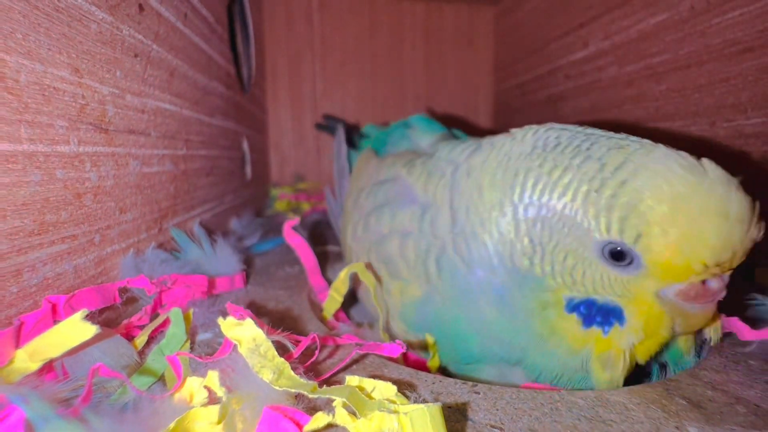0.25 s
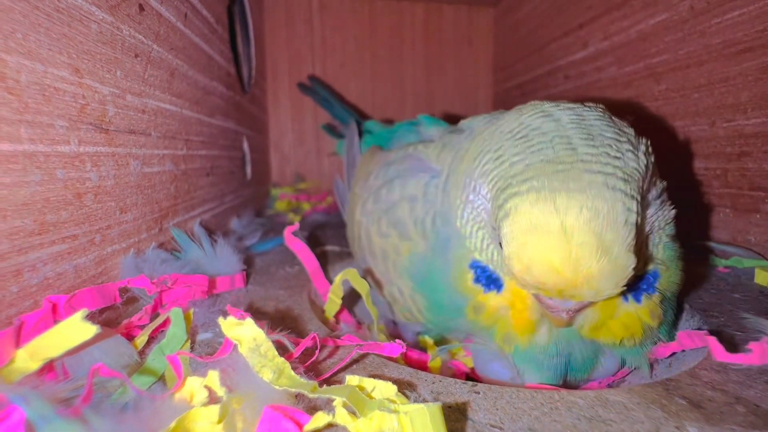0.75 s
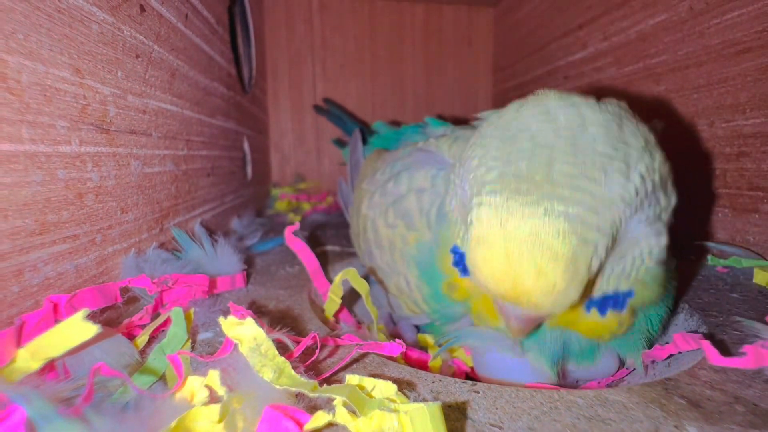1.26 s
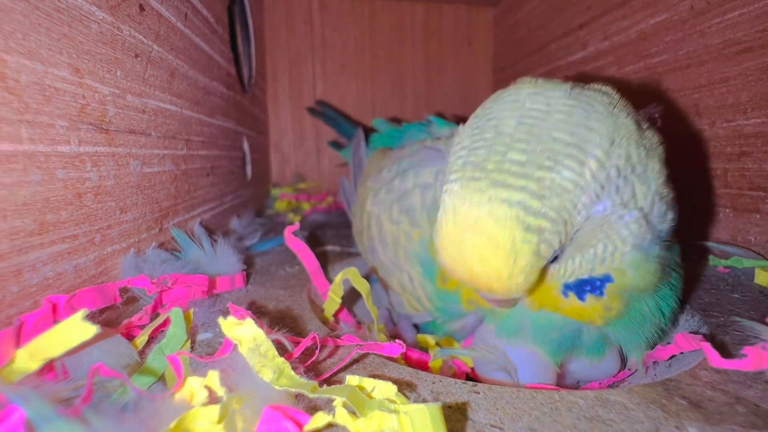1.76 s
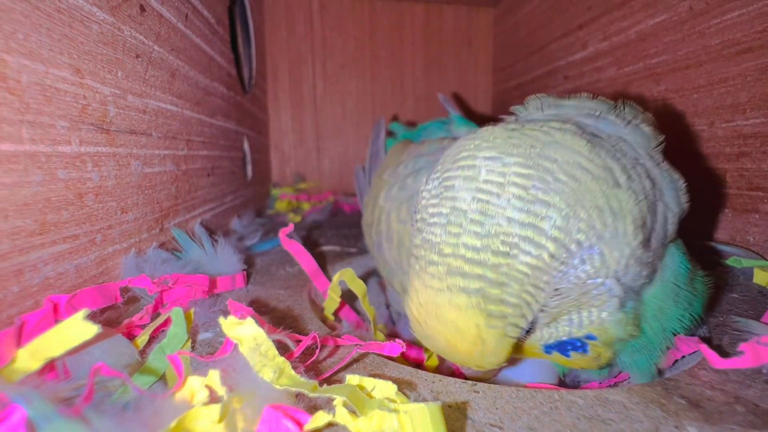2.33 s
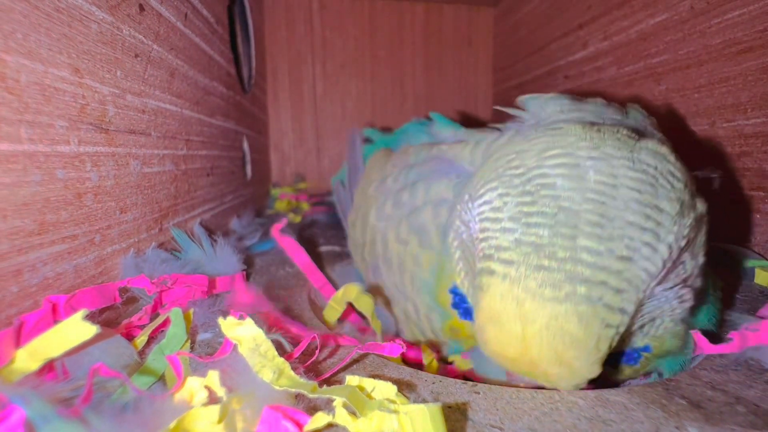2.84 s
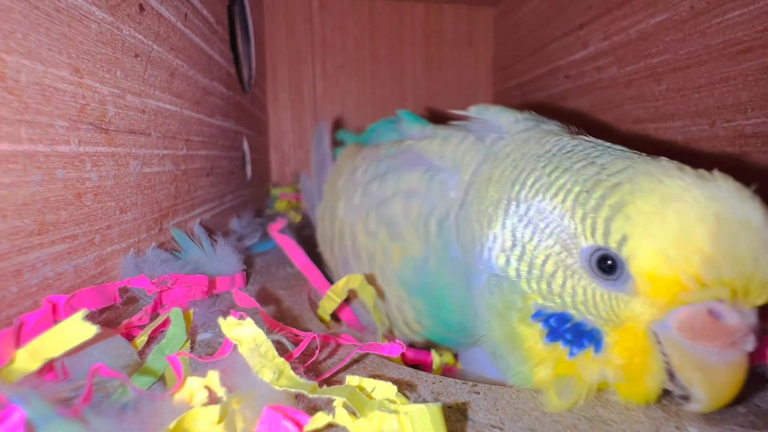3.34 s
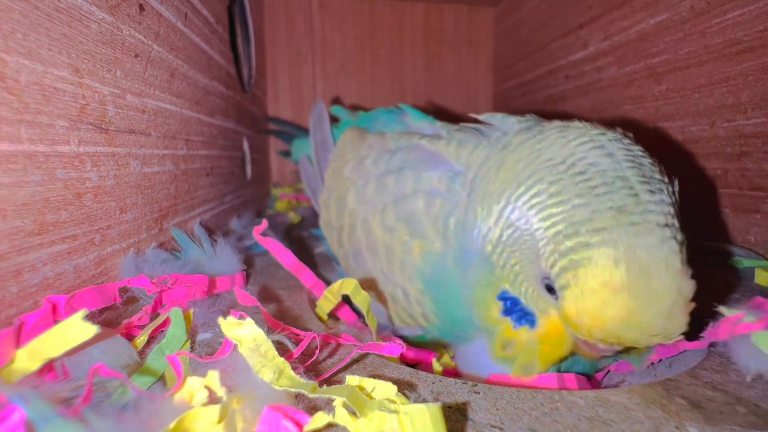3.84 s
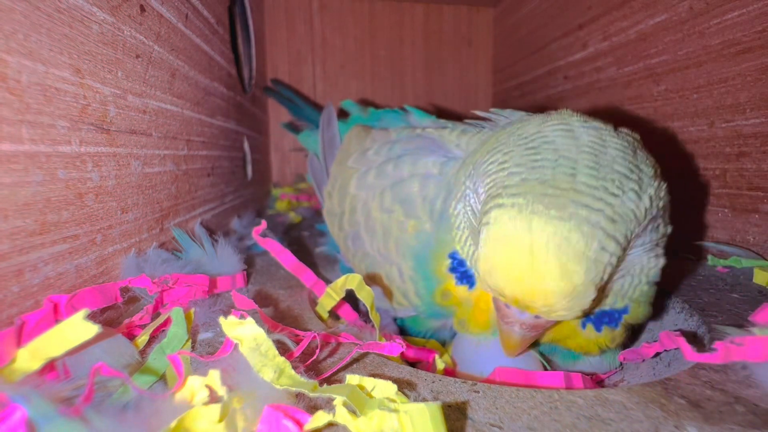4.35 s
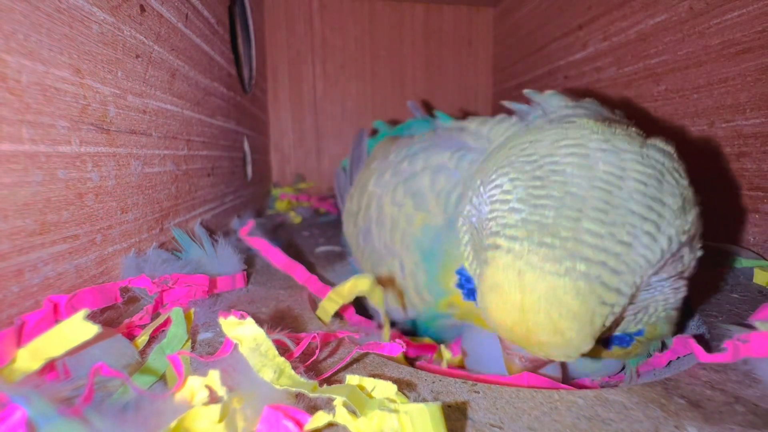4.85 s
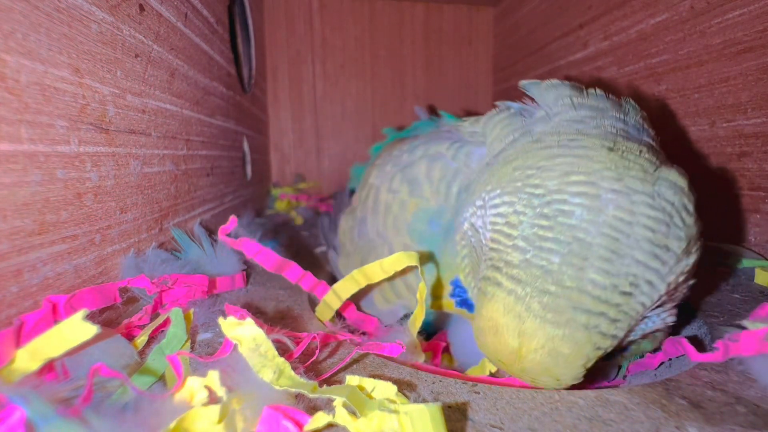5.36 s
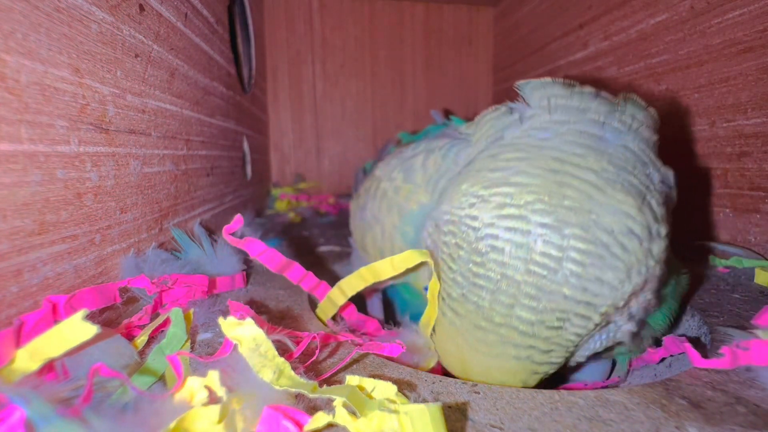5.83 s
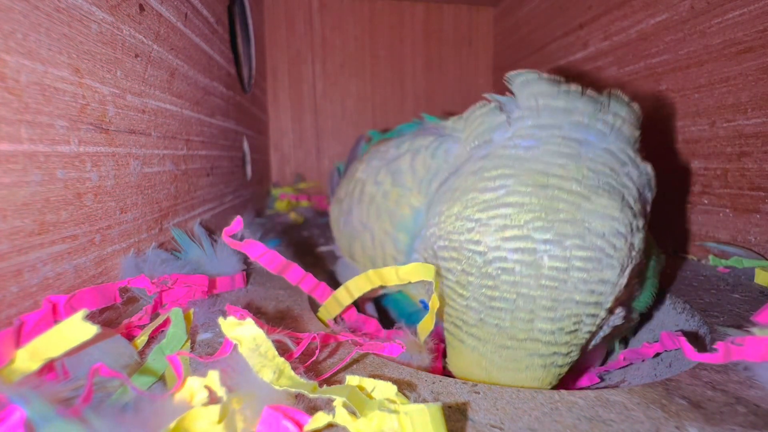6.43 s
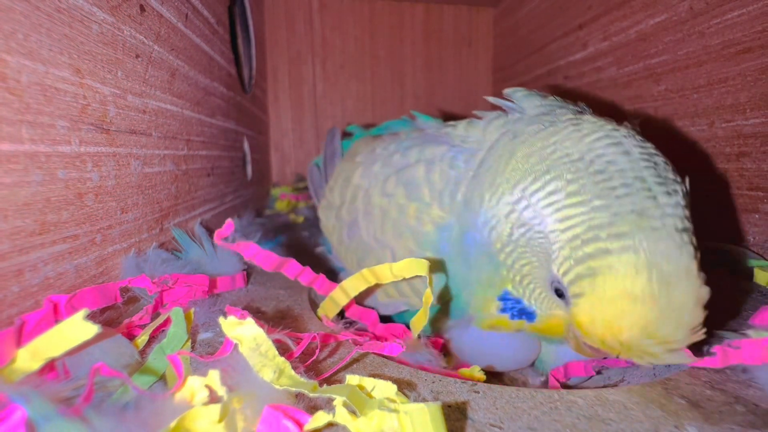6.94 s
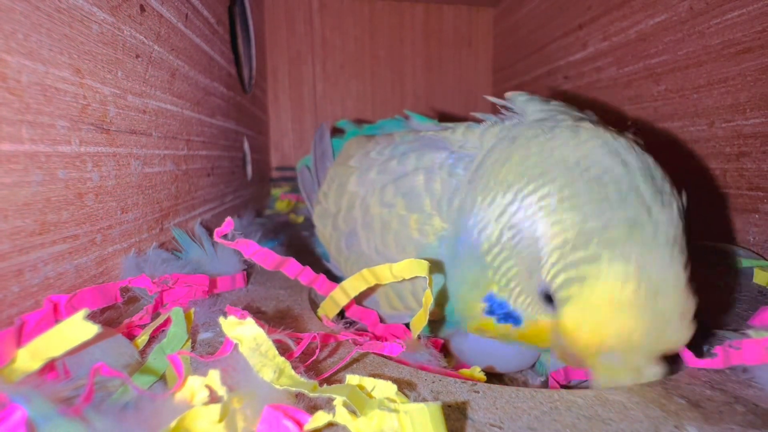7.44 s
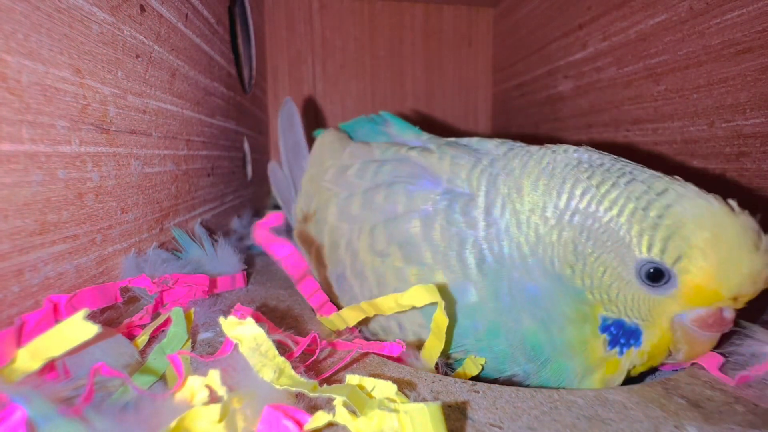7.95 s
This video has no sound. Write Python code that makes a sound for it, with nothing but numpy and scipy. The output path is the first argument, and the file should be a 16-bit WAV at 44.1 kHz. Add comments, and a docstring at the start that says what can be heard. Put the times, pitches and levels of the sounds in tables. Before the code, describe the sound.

Heard from close by, a wooden nest box gives a soft hollow thump as a small bird moves in its paper bedding. Scattered scratches and beak taps lead into a busier run of bumps on the floor, with paper strips crackling and snapping. After a short lull comes one more cluster of knocks and rustles. A faint electrical hum and steady hiss lie underneath throughout.

```python
"""A rustle and a knock come first: a small parrot shuffles in a wooden nest box lined with shredded paper.
Its feet, body and eggs bump the floor, whose panels boom; its claws and beak tap the wood,
and the paper strips crackle and snap. A faint tone joins in near the end. Behind it all are
a mains hum, a wavering low rumble and a steady hiss with a hump near two kilohertz."""
import sys
import numpy as np
from scipy import signal
from scipy.fft import rfft, irfft
from scipy.io import wavfile
from scipy.ndimage import uniform_filter1d

SR = 44100
rng = np.random.default_rng(int(sys.argv[2]) if len(sys.argv) > 2 else 0)


def unload_wav(signal):
    """Save mono or channel-first audio to the path in sys.argv[1] as 16-bit WAV at rate SR, clipped to [-1, 1]."""
    wavfile.write(
        sys.argv[1],
        SR,
        np.round(np.clip(np.atleast_2d(signal).T, -1, 1) * 32767).astype(np.int16),
    )


N = 361179

# the notes the box rings at, the floor panel's three first: f/Hz, level/dB, time to fade by 60 dB/s
BOX_NOTES = [(226.6, -12.5, 0.32), (257.2, -2, 0.099), (286.6, 5, 0.093), (409.3, -16, 0.061),
             (513.6, -19.5, 0.039), (612.4, -18.5, 0.036), (738, -12, 0.023), (880.4, -26.5, 0.091),
             (1214, -26, 0.02), (1350, -22, 0.03), (1451, -26, 0.053), (2226, -19, 0.016)]


def amp(db):
    """Turns decibels into a number to multiply by."""
    return 10 ** (np.asarray(db) / 20)


def unit(x):
    """Scales a signal to an average power of 1."""
    return x / np.sqrt(np.mean(x ** 2) + 1e-20)


def curve_at(points, hz):
    """Reads between the points of a frequency curve."""
    f, value = np.transpose(points)
    return np.interp(np.log(hz + 1), np.log(f + 1), value)


def add(mix, s, sound):
    """Mixes a sound in, starting at s seconds."""
    part = mix[..., round(s * SR):][..., :sound.shape[-1]]
    part += sound[..., :part.shape[-1]]


def shaped(x, gain):
    """Turns each frequency up or down by gain(Hz)."""
    return irfft(rfft(x) * gain(np.fft.rfftfreq(x.shape[-1], 1 / SR)), x.shape[-1])


def bell(hz, centre_hz, width):
    """A smooth hump round one pitch; width is in log frequency."""
    return np.exp(-(np.log((hz + 1) / centre_hz) / width) ** 2)


def wander(top_hz):
    """A random drift; a higher top_hz makes it quicker."""
    return unit(shaped(rng.standard_normal(N), lambda hz: np.exp(-(hz / top_hz) ** 2)))


def patchy(x, depth_db, size=14, top_hz=20000):
    """Makes random bands below top_hz swell and dip; size is their width in frequency steps."""
    hz, _, spectrum = signal.stft(x, SR, nperseg=512)
    patches = uniform_filter1d(rng.standard_normal(spectrum.shape[1:]), size=size, axis=0)
    patches = unit(uniform_filter1d(patches, size=8, axis=1))
    gain = amp(depth_db * patches * (hz < top_hz)[:, None])
    return signal.istft(spectrum * gain, nperseg=512)[1][:, :N]


def bouts(rows, rest_db, rise_db_s, fall_db_s, column=2):
    """A loudness curve: each row rises, holds and falls back to a resting level."""
    t, power = np.arange(N) / SR, np.full(N, amp(2 * rest_db))
    for row in rows:
        early, late = np.maximum(row[0] - t, 0), np.maximum(t - row[0] - row[1], 0)
        power += amp(2 * (row[column] - rise_db_s * early - fall_db_s * late))
    return np.sqrt(power)


def box_ring(spot_db=0):
    """Struck wood rings in fading notes: (floor panel, upper notes). spot_db favours some of them."""
    t = np.arange(6000) / SR
    hz, db, fade_s = np.transpose(BOX_NOTES)[..., None]
    notes = amp(db + spot_db - 60 * t / fade_s) * np.sin(2 * np.pi * hz * t)
    return notes[:3].sum(0), notes[3:].sum(0)


def clicks(per_s, spread_db):
    """Clicks at random times, a few of them large."""
    size = amp(spread_db * np.minimum(rng.exponential(1, N), 3.5)) * rng.choice([-1., 1.], N)
    return size * (rng.random(N) < per_s / SR)


def softened(ring, contact_s):
    """The longer a touch lasts, the duller the ring."""
    return np.convolve(ring, np.hanning(round(contact_s * SR)))


def shuffle():
    """The bird shifts its weight, and many tiny bumps and scuffs set the wood ringing."""
    # shifts of weight: start/s, hold/s, relative bump level/dB, relative scuff level/dB
    shifts = [(0.0, 0.019, -51.5, -56.5), (0.38, 0.088, -57, -65), (0.6, 0.076, -63.5, -68.5),
              (1.33, 0.087, -56.5, -75), (1.95, 0.18, -58.5, -74), (2.26, 0.29, -55, -67),
              (2.6, 0.45, -62.5, -67.5), (3.33, 0.16, -56, -58), (3.53, 0.13, -67, -63.5),
              (4.3, 0.07, -64, -85), (4.45, 0.32, -49, -72), (4.75, 0.44, -58.5, -66.5),
              (5.1, 0.24, -54, -63.5), (5.5, 0.43, -58.5, -70.5), (5.83, 0.1, -50, -72),
              (6.03, 0.2, -58.5, -69.5), (6.33, 0.21, -55.5, -65), (7.65, 0.21, -57.5, -63),
              (7.885, 0.052, -67, -58.5), (8.07, 0.029, -53.5, -57.5)]
    panel, upper = box_ring()
    boom = unit(signal.fftconvolve(clicks(130, 3.27), softened(panel, 0.0016))[:N])
    scuff, side = (signal.fftconvolve(clicks(450, 4.6), softened(upper, 0.00051))[:N] for _ in range(2))
    scuff = patchy(scuff + 0.18 * side * np.array([[1], [-1]]), 3.7, size=3)  # left and right differ
    bumping = bouts(shifts, rest_db=-70, rise_db_s=267, fall_db_s=91)
    scuffing = bouts(shifts, rest_db=-85, rise_db_s=267, fall_db_s=91, column=3)
    return bumping * boom + scuffing * unit(scuff * amp(1.6 * wander(21)))


def paper(noises):
    """Turns three noises (shared, left, right) into a left and right that sound like paper."""
    # how strong paper is at each pitch: f/Hz, level/dB
    paper_colour = [(590, -31), (1000, -6.5), (2150, -0.5), (3050, -13.5), (3750, -6.5), (4120, -10.5),
                    (5900, -6), (6700, -6.5), (9170, -9.5), (12700, -17.5), (15100, -15), (16000, -32)]
    # rustle heard on one side only: f/Hz, share
    one_side_share = [(4000, 0.041), (7000, 0.45), (15000, 0.43)]
    own = shaped(noises[1:], lambda hz: np.maximum(curve_at(one_side_share, hz), 0))
    return shaped(noises[0] + own, lambda hz: amp(curve_at(paper_colour, hz)))


def rustle():
    """Feathers and feet rub through the paper, and each strip crackles round its own pitch."""
    # strokes through the paper: start/s, hold/s, relative level/dB
    strokes = [(0.0, .085, -56), (0.14, 0.028, -61.5), (0.355, 0.029, -58), (0.41, 0.3, -72.5),
               (0.68, 0.027, -70), (1.19, 0.031, -71), (1.6, 0.037, -73.5), (2.265, 0.046, -65),
               (2.4, 0.032, -68.5), (2.52, 0.062, -65), (2.72, 0.041, -68), (2.82, 0.027, -61),
               (2.94, .11, -68.5), (3.325, 0.048, -54), (3.4, 0.039, -54.5), (3.475, 0.067, -60.5),
               (3.56, 0.11, -65), (3.9, 0.025, -69), (4.09, 0.046, -73), (4.52, 0.022, -64.5),
               (4.625, 0.1, -61.5), (4.805, 0.025, -59.5), (4.86, 0.28, -65), (5.14, 0.17, -67),
               (5.33, 0.2, -68.5), (5.59, 0.43, -71), (5.85, 0.069, -62.5), (6.06, 0.041, -72),
               (6.19, 0.13, -68.5), (6.4, 0.23, -72), (6.73, 0.15, -72.5), (7.45, 0.03, -66.5),
               (7.685, 0.049, -58), (7.87, 0.041, -52), (7.95, 0.027, -58.5), (8.09, 0.077, -62)]
    swell_s = 0.0012  # a crackle grows for this long, then dies away
    t, crackle = np.arange(500) / SR, np.zeros((3, N))
    for hz in np.geomspace(3550, 11300, num=6):
        noise = shaped(rng.standard_normal((3, len(t))), lambda f: bell(f, hz, 0.55))
        crack = unit(noise * t * np.exp(-t / swell_s))
        crackle += signal.fftconvolve(clicks(50, 4.05)[None], crack, axes=1)[:, :N]
    rubbing = 1.82 * rng.standard_normal((3, N))
    strips = patchy(paper(unit(crackle) + rubbing), 2.46)
    loudness = bouts(strokes, rest_db=-79.5, rise_db_s=750, fall_db_s=500)
    flutter = unit(amp(2.23 * wander(35)))
    return loudness * flutter * unit(strips)


def background():
    """Steady hiss, mains hum and a low rumble made of narrow, wavering bands of noise."""
    # hiss that both sides share: f/Hz, relative level/dB
    hiss_colour = [(74, -13), (125, -21.5), (153, -19), (287, -15.5), (440, -30), (843, -19), (1010, -39),
                   (1520, -24), (1750, -13.5), (1940, -11), (2850, -36), (5350, -45), (6160, -37.5),
                   (12500, -53), (16000, -67)]
    # hiss that sets left apart from right: f/Hz, relative level/dB
    side_colour = [(40, -5), (91, -3.5), (159, -14.5), (663, -10), (1900, -37.5), (3930, -39), (7360, -21),
                   (8340, -51), (16000, -44)]
    # bands of rumble: f/Hz, width/Hz, relative level/dB
    rumble_bands = [(46, 8.3, -75.5), (62.7, 6.7, -64.5)]
    mid, side = rng.standard_normal((2, N))
    mid = amp(-69.5) * unit(shaped(mid, lambda hz: amp(curve_at(hiss_colour, hz))))
    side = amp(-71.5) * unit(shaped(side, lambda hz: amp(curve_at(side_colour, hz))))
    hum_gain = amp(-58 + 0.94 * wander(13))
    hum_hz = 99.2 + 0.81 * wander(5.8)
    low = hum_gain * np.sqrt(2) * np.sin(2 * np.pi * np.cumsum(hum_hz) / SR)
    for hz, width, db in rumble_bands:
        band = shaped(rng.standard_normal(N), lambda f: np.exp(-((f - hz) / width) ** 2))
        low += amp(db) * unit(band)
    hiss = mid + side * np.array([[1], [-1]])
    hiss = patchy(hiss, 5.0, size=5, top_hz=1299)  # the lower hiss comes and goes
    return hiss + low * amp([[.9], [-.9]])


def taps():
    """A short, hard scratch of claw or beak rings the box's upper notes, a new blend at each spot."""
    # taps on the wood: t/s, relative peak level/dB, dull above f/Hz
    wood_taps = [(0.038, -36.5, 2500), (1.616, -53, 1500), (1.951, -48, 1100), (2.014, -49, 1100),
                 (2.261, -44, 1090), (2.353, -54, 1100), (2.494, -45.5, 1100), (2.804, -49.5, 1100),
                 (3.335, -36.5, 1000), (3.642, -59, 1100), (4.329, -42, 900), (4.674, -37, 1160),
                 (4.732, -47, 1300), (5.056, -41.5, 1110), (5.305, -43.5, 1200), (5.604, -50, 1100),
                 (7.905, -37, 3000), (7.918, -30.5, 2500), (7.973, -43, 910), (8.087, -42, 900)]
    out, t = np.zeros(N), np.arange(400) / SR
    for (s, db, top_hz), noise in zip(wood_taps, rng.standard_normal((len(wood_taps), len(t)))):
        scratch = signal.lfilter(*signal.butter(3, top_hz, fs=SR), noise * amp(-60 * t / 0.003))
        _, upper = box_ring(spot_db=1.6 * noise[-len(BOX_NOTES):, None])
        tap = signal.fftconvolve(upper, scratch)
        add(out, s, amp(db) * tap / abs(tap).max())
    return out


def knocks():
    """A soft bump rocks the floor panel a few times, and the panel rings out."""
    # knocks on the floor: t/s, relative peak level/dB, rocking f/Hz, contact time/ms
    floor_knocks = [(0.05, -24, 316, 13.8), (0.093, -45.5, 293, 11), (0.399, -45, 264, 13.6),
                    (0.458, -46.5, 263, 13.1), (1.194, -47, 296, 7.1), (1.335, -46, 267, 3.5),
                    (1.591, -44.5, 306, 9.1), (1.959, -44, 277, 12.8), (2.024, -44, 235, 8.6),
                    (2.278, -35.5, 239, 13.6), (2.361, -44, 303, 7.7), (2.566, -37.5, 240, 12.7),
                    (2.598, -42, 296, 10.6), (2.826, -38, 248, 9.9), (3.346, -30, 318, 18),
                    (3.367, -29, 320, 12.7), (3.382, -30, 293, 14.8), (3.414, -40.5, 282, 29.4),
                    (3.5, -35.5, 233, 6.7), (3.833, -47.5, 244, 14.7), (3.969, -46.5, 278, 8.8),
                    (4.145, -45.5, 297, 13.4), (4.312, -32.5, 255, 9.8), (4.339, -29.5, 243, 12.5),
                    (4.357, -41, 268, 14), (4.422, -37.5, 254, 16.2), (4.438, -38.5, 250, 17),
                    (4.481, -37, 266, 15.2), (4.523, -31.5, 254, 11.1), (4.543, -26, 263, 11.4),
                    (4.567, -34, 260, 9.7), (4.681, -26, 260, 6.2), (4.691, -32, 278, 12),
                    (4.706, -28.5, 282, 30.4), (4.723, -31, 252, 15.4), (4.741, -38, 270, 12),
                    (4.889, -35.5, 234, 11.6), (4.929, -39, 265, 12), (5.144, -31.5, 274, 10),
                    (5.164, -36, 256, 12.7), (5.185, -31.5, 300, 19.5), (5.235, -39, 277, 24.6),
                    (5.273, -28, 237, 15.5), (5.317, -35, 280, 18.4), (5.613, -42.5, 290, 18),
                    (5.8, -43, 294, 13.5), (5.873, -39.5, 272, 7.7), (5.95, -37, 264, 15),
                    (6.097, -47.5, 277, 22), (6.161, -43.5, 270, 9.7), (6.283, -44.5, 267, 9),
                    (6.313, -43, 238, 14.5), (6.487, -46.0, 278, 6.9), (7.074, -48.5, 280, 8.3),
                    (7.685, -41, 261, 3.6), (7.74, -38.5, 287, 21.5), (7.758, -39.5, 284, 20),
                    (7.892, -42, 264, 20), (7.913, -24, 268, 10.3), (7.928, -22, 294, 18.77),
                    (7.944, -24, 260, 8.9), (7.977, -36.5, 282, 14.5), (8.087, -40.5, 278, 11),
                    (8.123, -40.5, 272, 11.7)]
    press_db_s, touch_db = 303, -12.5  # extra fading under a resting foot; first touch against the boom
    out, (panel, upper) = np.zeros(N), box_ring()
    touch = softened(upper, 0.0013)
    damped = (panel + .5 * upper) * amp(-press_db_s * np.arange(len(panel)) / SR)
    for (s, db, hz, contact_ms), turn in zip(floor_knocks, rng.random(len(floor_knocks))):
        t = np.arange(round(contact_ms * SR / 1000)) / SR
        push = np.sin(2 * np.pi * (hz * t + turn)) * np.hanning(len(t))
        boom = signal.fftconvolve(damped, push)
        add(out, s - 0.835 * t[-1], amp(db) * boom / abs(boom).max())
        add(out, s - 0.5886 * t[-1], amp(db + touch_db) * touch / abs(touch).max())
    return out


def snaps():
    """Paper and claws snap: short bursts of noise, each brightest round its own pitch."""
    # single snaps: t/s, relative peak level/dB, centre f/Hz
    paper_snaps = [(0.0757, -48, 5470), (1.361, -57, 4770), (1.615, -51, 1560), (1.7347, -49, 5800),
                   (1.95, -48, 8400), (2.202, -54, 8400), (2.261, -50, 5170), (2.5482, -45.5, 5800),
                   (2.831, -42.5, 5520), (2.923, -53, 6900), (3.071, -47.5, 5470), (3.3646, -37.5, 5000),
                   (3.5014, -32, 6670), (3.5224, -37.5, 6500), (3.535, -45, 6640), (3.817, -54.5, 6350),
                   (4.509, -53, 7040), (4.6192, -37, 3800), (4.668, -42.5, 6500), (4.7024, -45, 6510),
                   (4.936, -51, 7550), (4.981, -46, 5950), (5.052, -46.5, 5500), (5.118, -45, 6200),
                   (5.131, -34.5, 5400), (5.242, -48.5, 5200), (5.598, -51.5, 5870), (5.7814, -49, 5670),
                   (5.8542, -47, 5630), (6.067, -46, 7000), (6.179, -50, 5300), (6.19, -54, 7000),
                   (6.3015, -54, 5870), (6.42, -59, 5000), (6.4744, -63, 5620), (6.5953, -44, 7000),
                   (6.758, -55, 1480), (6.8, -46.5, 7100), (7.648, -45.5, 8340), (7.9015, -34, 8300),
                   (7.929, -37.5, 6500), (8.1199, -35.5, 5160), (8.126, -45, 6200)]
    rise_s, fade_s, tail_s, tail_db = 0.0018, 0.0091, 0.065, -23
    out, t = np.zeros((2, N)), np.arange(2048) / SR
    rise = (1 - np.exp(-t / rise_s)) ** 2
    fall = amp(-60 * t / fade_s) + amp(tail_db - 60 * t / tail_s)
    for (s, db, hz), noises in zip(paper_snaps, rng.standard_normal((len(paper_snaps), 3, len(t)))):
        bright = shaped(paper(noises),
                        lambda f: 0.44 / (1 + (0.39 * hz / (f + 1)) ** 2) + bell(f, hz, 0.039))
        burst = unit(bright) * rise * fall
        add(out, s - .001, amp(db) * burst / abs(burst).max())
    return out


def faint_tone():
    """A faint held tone near the end, its pitch wavering a little."""
    level_db = np.interp(np.arange(N) / SR, [7.96, 8.005, 8.19], [-101, -65.5, -72])
    pitch_hz = 883 + 12.06 * wander(31)
    return amp(level_db) * np.sqrt(2) * np.sin(2 * np.pi * np.cumsum(pitch_hz) / SR)


def scene():
    """Mixes wood, paper, tone and background; the paper reaches left and right out of step."""
    # how far the left wave is ahead of the right (minus means behind): f/Hz, phase/radians
    left_lead = [(4740, -0.57), (6370, -1.4), (8010, 0.37), (8960, -2.03), (16000, -1.2)]
    wood = (knocks() + taps() + shuffle()) * amp([[-.8], [.8]])  # a little to the right
    left, right = amp(-5) * (rustle() + snaps())
    left = shaped(left, lambda hz: np.exp(.5j * curve_at(left_lead, hz)))
    right = shaped(right, lambda hz: np.exp(-.5j * curve_at(left_lead, hz)))
    return wood + np.array([left, right]) + faint_tone() + background()


def record(dry):
    """The microphone loses the lowest bass; then the highest treble is cut off."""
    bass_hz, treble_hz = 38, 15780
    heard = signal.sosfilt(signal.butter(4, bass_hz, "high", fs=SR, output="sos"), dry)
    treble_cut = signal.firwin(1023, treble_hz, window=("kaiser", 9), fs=SR)
    return signal.oaconvolve(heard, treble_cut[None], "same")


dry = scene()
out = record(dry)
unload_wav(out)
```